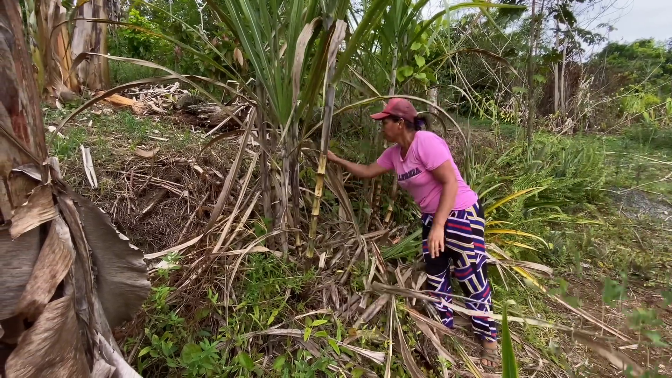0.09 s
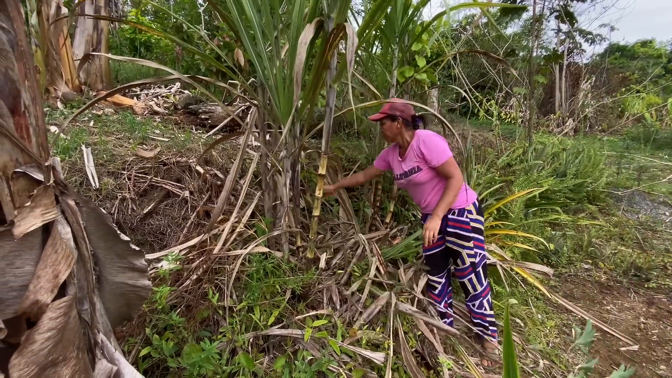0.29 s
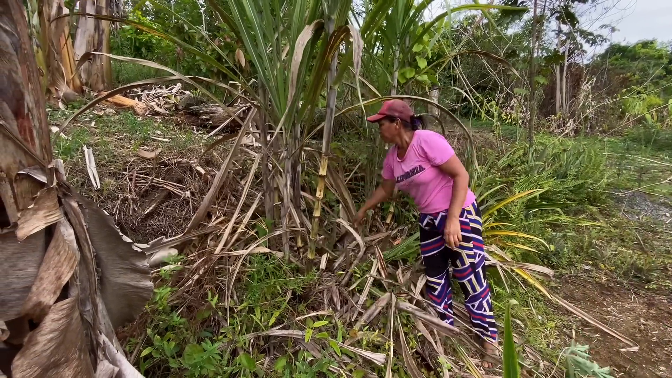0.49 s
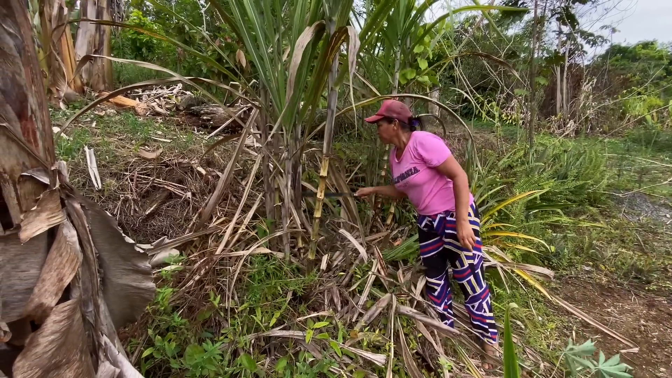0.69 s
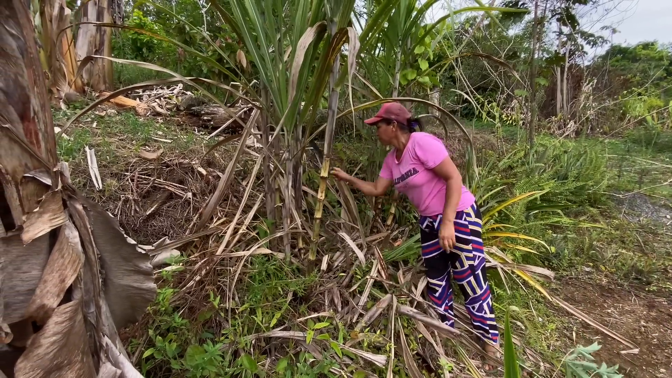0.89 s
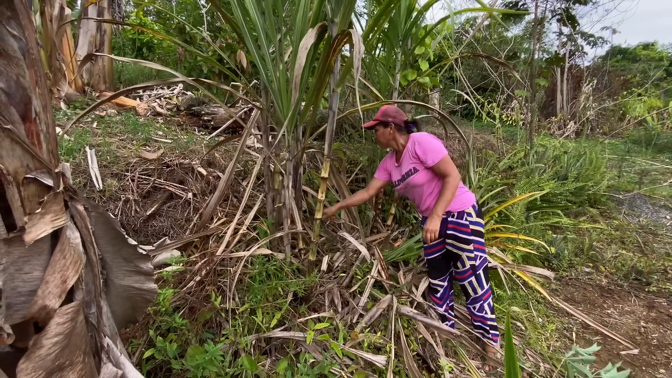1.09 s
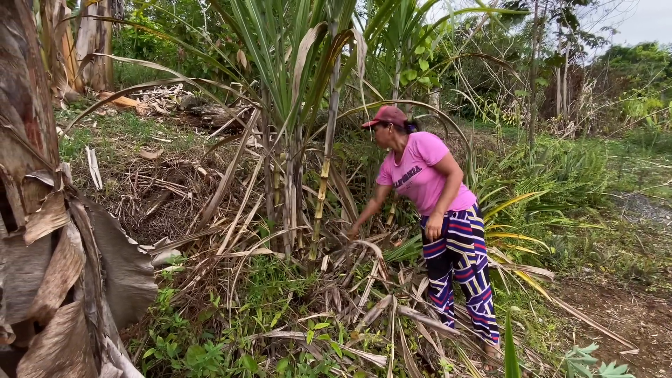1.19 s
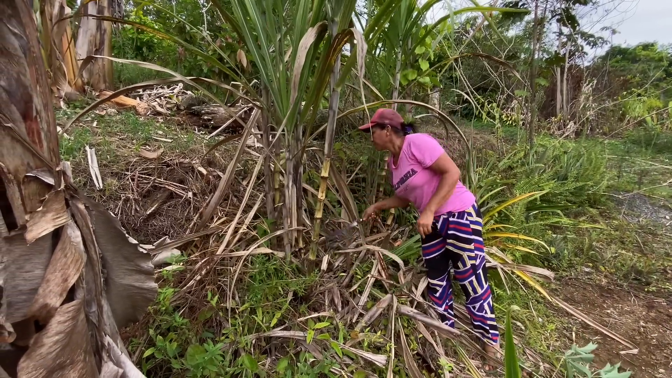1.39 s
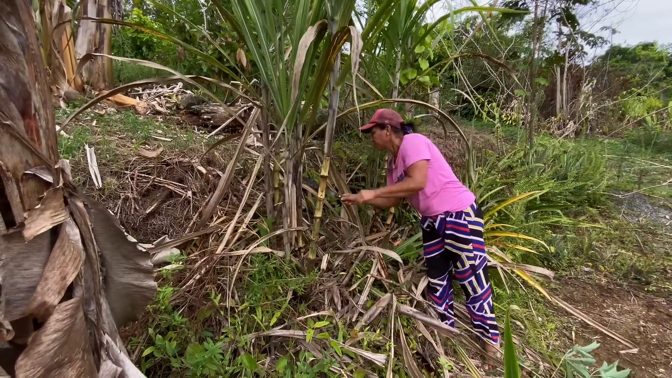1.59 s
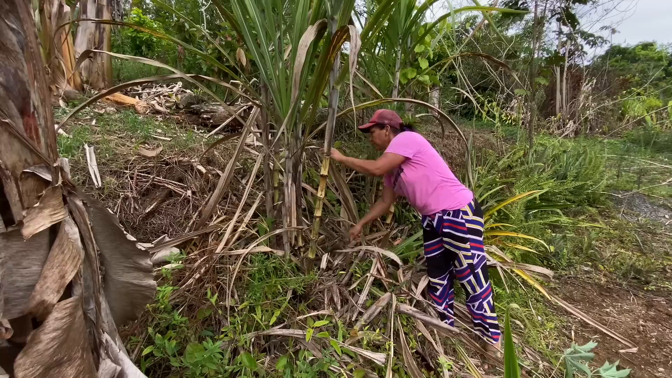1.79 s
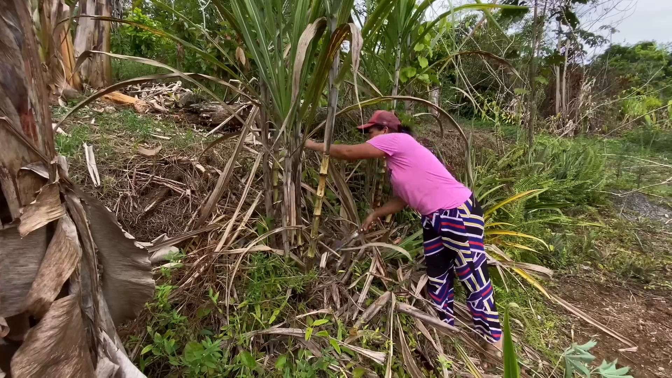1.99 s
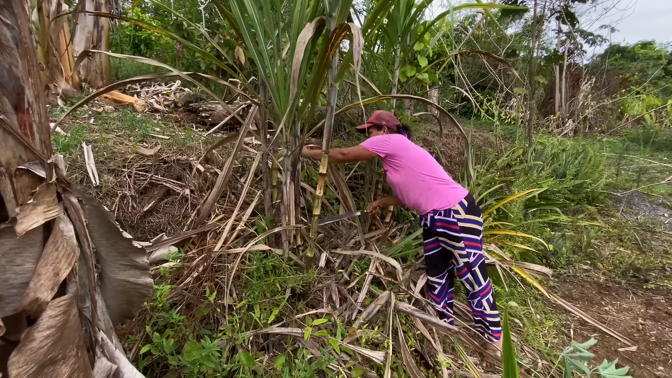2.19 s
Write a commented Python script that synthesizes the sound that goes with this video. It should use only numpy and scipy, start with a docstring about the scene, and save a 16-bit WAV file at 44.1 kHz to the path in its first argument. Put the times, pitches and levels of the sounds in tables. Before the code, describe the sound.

A machete slashes dry cane leaves in two crunching sweeps, then one short chop knocks a stalk

```python
"""Blade through dry cane

A blade sweeps three times through dry cane leaves in an open field: two long crunching strips, then one
short chop on a stalk, followed by a hollow knock. Leaves are trains of random snaps under envelopes; the
stalk is a sum of damped modes with scattered echoes; the swaying clump gives low damped sines.
The leaves settle between the strokes over a quiet floor of shaped noise with a throbbing insect band."""
import sys
import numpy as np
from scipy import signal
from scipy.fft import rfft, irfft
from scipy.io import wavfile
from scipy.ndimage import uniform_filter1d

SR = 44100
rng = np.random.default_rng(int(sys.argv[2]) if len(sys.argv) > 2 else 0)


def transcribe(u):
    """Save the signal u as a 16-bit wav file named by the first command-line argument.

    u: samples, shape (n,) or (channels, n), limited to [-1, 1]; the rate is SR.
    q: integer samples, one column per channel.
    """
    v = np.clip(np.atleast_2d(u).T, -1, 1)
    q = np.round(v * 32767).astype(np.int16)
    wavfile.write(sys.argv[1], SR, q)


N = 97020  # samples, 2.2 s


def amp(db):
    """Decibel law: level to amplitude ratio."""
    return 10 ** (np.asarray(db) / 20)


def evened(x):
    """Normalisation: scales to rms 1."""
    return x / np.sqrt(np.mean(x ** 2) + 1e-20)


def add(mix, start_s, sound):
    """Superposition: adds a sound into the mix at its start time."""
    part = mix[..., max(round(start_s * SR), 0):][..., :sound.shape[-1]]
    part += sound[..., :part.shape[-1]]


def coloured(x, points, lo_hz, hi_hz):
    """Spectral shaping: filters x by a curve in log frequency, then scales it to rms 1 within lo-hi."""
    hz = np.fft.rfftfreq(N, 1 / SR)
    curve_hz, curve_db = np.transpose(points)
    spectrum = rfft(x) * amp(np.interp(np.log(hz + 1), np.log(curve_hz + 1), curve_db))
    band = (hz > lo_hz) & (hz < hi_hz)
    band_energy = np.mean(np.sum(abs(spectrum[..., band]) ** 2, -1))
    return irfft(spectrum, N) * N / np.sqrt(2 * band_energy)


# spectrum of the quiet air: (frequency [Hz], relative density [dB per Hz])
AIR_SPECTRUM = [(20, -6), (50, 8), (90, -2), (150, -10), (320, -12), (600, -9.5), (2000, -31), (4500, -2),
                (5500, -12), (7000, 16), (9000, -21), (16500, -27)]
AIR_DB = -64.5
INSECT_HZ, INSECT_WIDTH_HZ, INSECT_DB = 7510, 470, -65
INSECT_THROB = 0.1  # rms depth of the level modulation


def field():
    """Stationary noise: quiet air, plus an insect band amplitude-modulated by slow noise."""
    insect_band = [(INSECT_HZ - INSECT_WIDTH_HZ, -40), (INSECT_HZ - INSECT_WIDTH_HZ / 2, 0),
                   (INSECT_HZ + INSECT_WIDTH_HZ / 2, 0), (INSECT_HZ + INSECT_WIDTH_HZ, -40)]
    throb = 1 + INSECT_THROB * evened(uniform_filter1d(rng.standard_normal(N), size=500))
    air_noise, insect_noise = rng.standard_normal((2, 2, N))
    air = evened(coloured(air_noise, AIR_SPECTRUM, 20, 16000))
    insects = throb * evened(coloured(insect_noise, insect_band, 20, 16000))
    return amp(AIR_DB) * air + amp(INSECT_DB) * insects


# low pushes of air as the clump sways: (time [s], level [dB], pitch [Hz], t60 [s])
SWAY_PUSHES = [(.335, -45, 62, 0.23), (0.399, -41.5, 76, 0.098), (.53, -60, 60, 0.13),
               (.65, -53.5, 53.4, 0.3), (1.05, -60, 80, 0.089), (1.149, -43, 59.7, 0.13),
               (1.29, -56, 60, 0.17), (1.806, -38, 65, .15), (1.86, -49, 60, 0.194), (1.985, -49, 56, .2),
               (2.13, -60, 50, 0.17)]


def sway():
    """Damped oscillation: low sines that swell over one cycle as they die away."""
    out = np.zeros(N)
    t = np.arange(SR // 3) / SR
    for start, db, hz, t60 in SWAY_PUSHES:
        swell = np.minimum(t * hz, 1) ** 2
        add(out, start, amp(db - 60 * t / t60) * swell * np.sin(2 * np.pi * hz * t))
    return out


ECHO_DB, ECHO_T60_S = -19, .025


def echoes(x):
    """Diffuse scattering: sparse, decaying random taps from the ground and nearby plants."""
    t = np.arange(SR // 4) / SR
    signs = rng.choice([-1., 1.], (2, len(t)))
    present = (rng.random((2, len(t))) < .05) * (t > .003)
    taps = signs * present * amp(-60 * t / ECHO_T60_S)
    return amp(ECHO_DB) * signal.oaconvolve(x, taps / np.linalg.norm(taps[0]), axes=1)[:, :N]


# knocks on the hollow stalk:
# (time [s], level [dB], pitch factor [1], time until leaves smother the ring by 60 dB [s])
STALK_KNOCKS = [(.248, -12, 1.3, .01), (.2545, -14, .62, .012), (.278, -17, .85, .01),
                (.326, -14, .68, .01), (.403, -18, .95, .01), (1.088, -16, .97, .011),
                (1.095, -16, .8, .01), (1.13, -18, 1.1, .01), (1.788, -24, 1.02, .008),
                (1.7995, -8, .97, .009), (1.806, -8, 1.1, .009), (1.812, -9, 1.25, .008),
                (1.828, -20, 1.02, .007), (1.9185, -25, 1.25, .008), (1.9225, -28, .95, .009),
                (1.926, -28, .92, .009), (1.9372, -8, 1.01, .017), (1.9458, -14, 1.05, .011),
                (1.952, -23, 1.08, .009)]
# modes of the hollow stalk: (frequency at pitch factor 1 [Hz], level [dB], t60 before smothering [s])
STALK_MODES = [(850, -16, .03), (1513, 0, .09), (2186, -7, .05), (2950, -8, .04), (3693, -17, .04)]
KNOCK_RISE_S = .002
KNOCK_PAN_DB = -3  # first hearing; the second gets the opposite


def stalk():
    """Modal synthesis: each knock rings the stalk's damped modes until leaves smother it, then scatters."""
    out = np.zeros(N)
    t = np.arange(SR // 20) / SR
    rise = np.sin(np.pi / 2 * np.minimum(t / KNOCK_RISE_S, 1)) ** 2
    for start, db, pitch, smother in STALK_KNOCKS:
        ring = sum(amp(mode_db - 60 * t / t60) * np.sin(2 * np.pi * hz * pitch * t)
                   for hz, mode_db, t60 in STALK_MODES)
        add(out, start, amp(db - 60 * (t / smother) ** 3) * rise * ring)
    direct = out * amp([[KNOCK_PAN_DB], [-KNOCK_PAN_DB]])
    return direct + echoes(direct)


def crackle(per_s, spread_db, t60, lo_hz, hi_hz, ring, count=32):
    """Shot noise: random snaps, each a dying ringing burst; hearings share the snaps, not the fine detail."""
    happens = rng.random(N) < per_s / SR
    size = happens * amp(spread_db * np.minimum(rng.exponential(1, N), 4.2))
    kind = rng.integers(0, count, N)
    t = np.arange(1500) / SR
    out = np.zeros((2, N))
    for k, hz in enumerate(np.geomspace(lo_hz, hi_hz, count)):
        tone = np.sin(2 * np.pi * (hz * rng.uniform(1.0, 1.04) * t + rng.random((2, 1))))
        burst = (1 - ring) * rng.standard_normal((2, len(t))) + ring * tone
        burst = burst * amp(-60 * t / (t60 * rng.uniform(.4, 1.6)))
        snaps = (size * (kind == k))[None]
        out += signal.oaconvolve(snaps, burst / np.linalg.norm(burst), axes=1)[:, :N]
    return out


# stirring of the leaves: (time [s], leaf crackle [dB], sheath crackle [dB], low shake [dB])
STIRRING = [(0, -38, -37, -75), (0.043, -43.5, -50, -52.5), (.08, -48, -54, -65.5), (.193, -50.5, -51, -78),
            (0.203, -35.5, -51, -41.5), (0.232, -25.5, -32.5, -52), (.26, -25, -29.5, -39.5),
            (.31, -25, -25.5, -39.5), (.345, -27.5, -34.5, -44), (0.419, -31, -33.5, -44),
            (0.469, -41, -52, -59), (.6, -47, -49, -61), (.7, -52, -55, -67), (.8, -57, -66.5, -69.5),
            (0.986, -60.5, -66, -72), (0.997, -46.5, -50, -54.5), (1.041, -55, -45.5, -58.5),
            (1.045, -27.5, -36, -40), (1.075, -30, -35, -51), (1.11, -27.5, -40, -40),
            (1.155, -28.5, -31.5, -46.5), (1.21, -38, -46.5, -57), (1.28, -37, -55, -62.5),
            (1.37, -49, -54, -66.5), (1.42, -51.5, -59, -66), (1.501, -66, -61, -72.5),
            (1.773, -62.5, -70, -70.5), (1.778, -44.5, -50, -60), (1.801, -35, -32, -48),
            (1.828, -32.5, -39, -42.5), (1.891, -45.5, -47, -65.5), (1.95, -41.5, -36, -59),
            (1.978, -46, -51, -62.5), (2.05, -57, -55.5, -72), (2.2, -49.5, -56.5, -64)]
# crunches as the blade tears leaves: (time [s], peak level before CREST_DB [dB], sheath re leaf [dB],
# shake re leaf [dB], time to build up by 60 dB [s], t60 [s])
TEARING = [(0.0014, -32, -21, -35.5, 0.012, 0.052), (0.0095, -23.5, -15, -38, 0.012, 0.072),
           (0.0244, -27.5, -15, -19, 0.015, 0.087), (0.0586, -31.5, -22, -31, 0.01, 0.051),
           (0.1223, -33, -17, -15, 0.012, 0.069), (0.162, -35.5, 2, -24, 0.011, 0.049),
           (0.2317, -10, -29, -48, 0.017, 0.092), (0.2492, -9.5, 2.5, -30, 0.026, 0.073),
           (0.254, -6, -13, -23, 0.015, 0.067), (0.2624, -11.5, -19.5, -21, 0.013, 0.048),
           (0.276, -18, -2, -17, 0.012, 0.06), (0.2954, -15.5, -10, -25, 0.012, 0.073),
           (0.3222, -8.5, -6, -14.5, 0.026, 0.085), (0.3277, -10, -11, -24, 0.014, 0.051),
           (0.3614, -19, -14.5, -28, 0.011, 0.071), (0.3995, -18, 3.5, -15, 0.017, 0.064),
           (0.5894, -43, -26.5, -31.5, 0.012, 0.054), (0.6594, -44, -5, -15, 0.016, 0.06),
           (0.7457, -50.5, -19, -28, 0.012, 0.06), (0.813, -44.5, 3, -24, 0.01, 0.073),
           (0.944, -45, -17, -28, 0.0087, 0.076), (1.046, -12.5, -4, -21, 0.014, 0.076),
           (1.0538, -25.5, -10, -1.5, 0.019, 0.044), (1.0873, -16, 5.5, -21, 0.012, 0.055),
           (1.0937, -14.5, 2.5, -36, 0.017, 0.074), (1.1034, -12.5, -22.5, -28, 0.013, 0.064),
           (1.1298, -17, 4, -7.5, 0.01, 0.087), (1.1423, -16, 0.5, -20, 0.0093, 0.037),
           (1.1894, -25, -5, -20, 0.012, 0.039), (1.2434, -41, -13, -35, 0.012, 0.06),
           (1.275, -23.5, -23, -47, 0.013, 0.05), (1.548, -46.5, -21, -19, 0.012, 0.065),
           (1.668, -45.5, -1.5, -19, 0.014, 0.065), (1.7874, -30, 0, -23, 0.012, 0.06),
           (1.7974, -10, -3, -33, 0.012, 0.088), (1.806, -6, -0.5, -15.5, 0.016, 0.054),
           (1.814, -11.5, -0.5, -7.5, 0.012, 0.05), (1.8475, -28, -16, -22, 0.012, 0.055),
           (1.995, -29.5, -19, -34, 0.0086, 0.095), (2.1021, -35, -17, -23, 0.013, 0.13),
           (2.1482, -30.5, -15, -31, 0.012, 0.035), (2.1894, -38, -18, -27, 0.012, 0.06)]
CREST_DB = -10  # added to every crunch level
PEAK_S = 0.0013  # delay from the listed time to the crunch's peak
# spectra of thin leaves, thick sheaths and the shaking clump: (frequency [Hz], relative density [dB per Hz])
LEAF_SPECTRUM = [(200, -28), (400, -19.5), (900, -12.5), (2200, -4), (4000, -9.5), (7000, -7), (10000, -8),
                 (13500, -11), (15000, -14.5), (16500, -20)]
SHEATH_SPECTRUM = [(300, -11), (600, -9), (1000, -5), (1500, -1.5), (2200, 3), (3000, -2.5), (5000, -15)]
SHAKE_SPECTRUM = [(20, -57), (45, -33.5), (80, -2), (200, 3.5), (450, 2), (800, 4), (1500, -23)]
# snaps of leaf and sheath: (mean rate [per s], size spread [dB], central t60 [s],
# lowest nominal ring [Hz], highest nominal ring [Hz], ringing share [0-1])
LEAF_SNAPPING = (3500, 2.35, 0.016, 2170, 15000, 0.3)
SHEATH_SNAPPING = (1300, 3.5, .018, 500, 2800, .55)


def leaves():
    """Power addition: crunch envelopes ride on the stirring of leaf crackle, sheath crunch and clump shake."""
    t = np.arange(N) / SR
    stir_s, *layers_db = np.transpose(STIRRING)
    power = np.array([amp(2 * np.interp(t, stir_s, db)) for db in layers_db])
    for start, db, sheath_db, shake_db, build, t60 in TEARING:
        after_peak = t - start - PEAK_S
        slope_db = -60 * np.maximum(-after_peak / build, after_peak / t60)
        # doubled decibels turn amplitude ratios into power ratios
        power += amp(2 * (db + CREST_DB + slope_db)) * amp([[0], [2 * sheath_db], [2 * shake_db]])
    leaf, sheath, shake = np.sqrt(power)
    leaf_sound = leaf * coloured(crackle(*LEAF_SNAPPING), LEAF_SPECTRUM, 2500, 12000)
    sheath_sound = sheath * coloured(crackle(*SHEATH_SNAPPING), SHEATH_SPECTRUM, 700, 2500)
    shake_sound = shake * coloured(rng.standard_normal((2, N)), SHAKE_SPECTRUM, 60, 500)
    return leaf_sound + sheath_sound + shake_sound


def scene():
    """Superposition: two hearings of the field and the cane clump."""
    return field() + sway() + stalk() + leaves()


# microphone pair: (frequency [Hz], likeness [0-1], phase by which right leads [rad], left re right [dB])
MICROPHONE_PAIR = [(0, .97, 0, 1.5), (200, .98, -.05, 1), (600, .85, -.3, 0), (1200, .85, -1.1, -2),
                   (1750, .75, -2.4, -4), (2700, .65, -3, 1.5), (3600, .35, -5, 5), (5000, .5, -9.4, 1.5),
                   (6300, .35, -11.6, 2.5), (7600, .2, -14, 0), (8700, .4, -15.7, 0), (9300, .85, -15.7, 0),
                   (10200, .5, -14, 0), (11000, .95, -12.57, 0), (11600, .97, -12.57, 0),
                   (12100, .65, -11.6, 0), (12800, .99, -9.5, 0), (13700, .99, -9.35, 0),
                   (14200, .45, -8.1, 0), (14700, .98, -6.3, 0), (17000, .99, -6.28, 0)]
SMOOTH_BINS = 300  # frequency bins averaged along each column
LOW_CUT_HZ, EDGE_HZ = 39, 15900


def record(dry):
    """Partial coherence: low cut, two ports with shared sound and phase shifts by frequency, band limit."""
    hz = np.fft.rfftfreq(N, 1 / SR)
    pair_hz, *columns = np.transpose(MICROPHONE_PAIR)
    like, lead, tilt_db = (uniform_filter1d(np.interp(hz, pair_hz, column), size=SMOOTH_BINS)
                           for column in columns)
    like = np.clip(like, 0, 1)
    low_cut = signal.butter(4, LOW_CUT_HZ, "high", fs=SR, output="sos")
    first, second = rfft(signal.sosfilt(low_cut, dry))
    # the quadrature mix keeps the power when both hearings are equally strong
    right = (like * first + 1j * np.sqrt(1 - like ** 2) * second) * np.exp(1j * lead)
    pair = irfft(np.array([first * amp(tilt_db / 2), right * amp(-tilt_db / 2)]), N)
    band_limit = signal.firwin(511, EDGE_HZ, window=("kaiser", 9), fs=SR)
    return signal.oaconvolve(pair, band_limit[None], "same")


dry = scene()
out = record(dry)
transcribe(out)
```